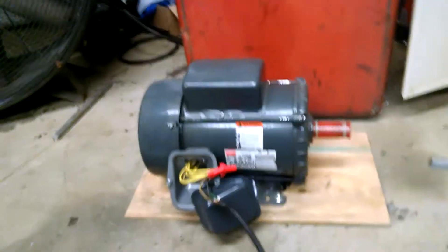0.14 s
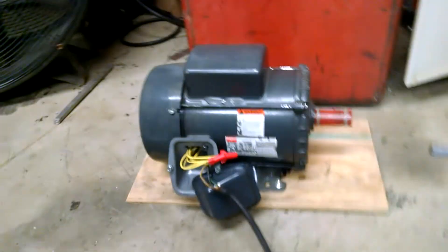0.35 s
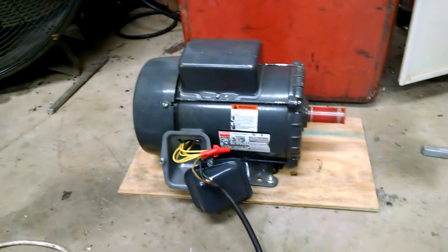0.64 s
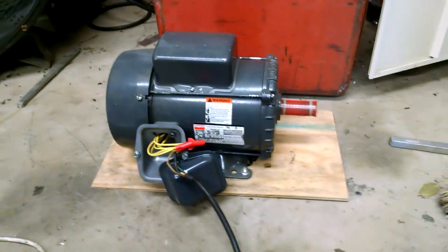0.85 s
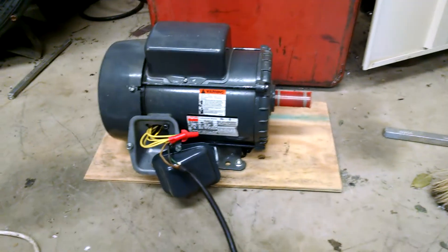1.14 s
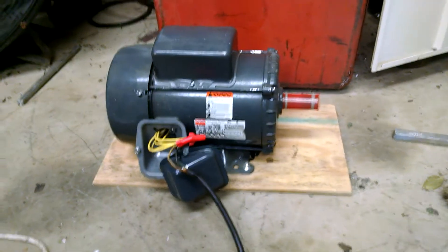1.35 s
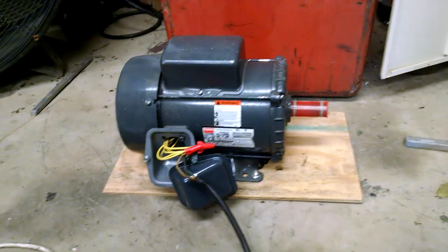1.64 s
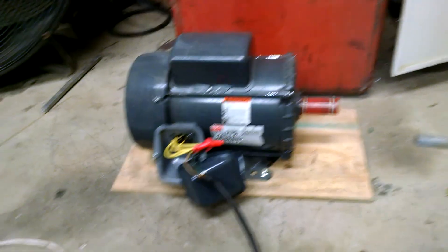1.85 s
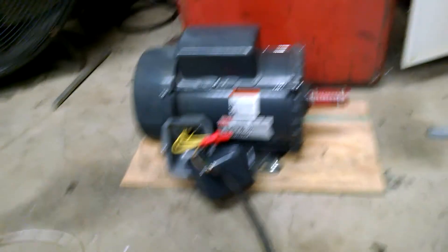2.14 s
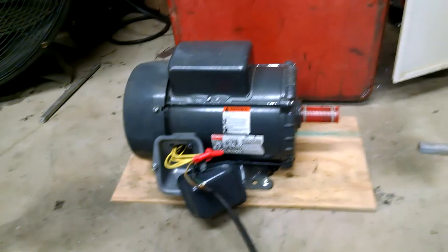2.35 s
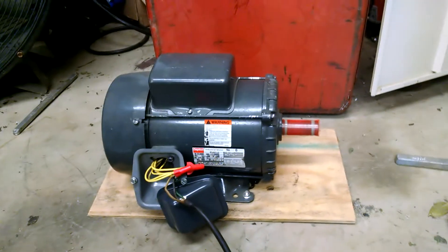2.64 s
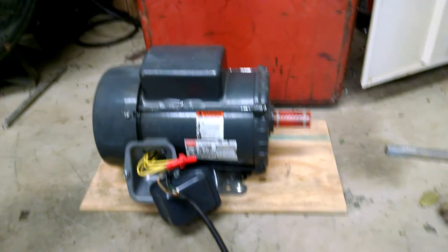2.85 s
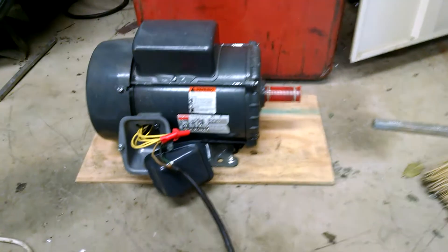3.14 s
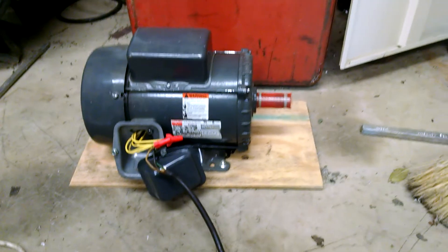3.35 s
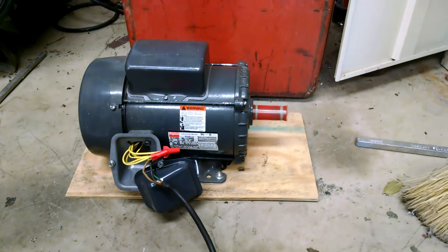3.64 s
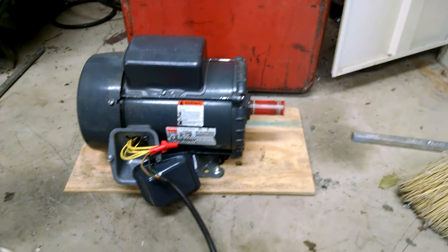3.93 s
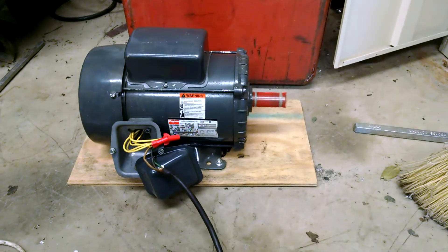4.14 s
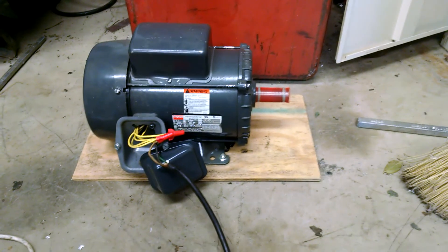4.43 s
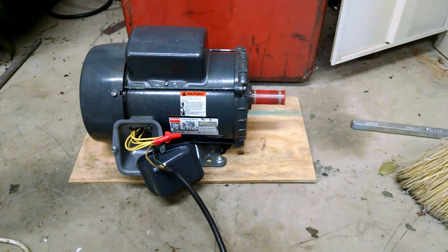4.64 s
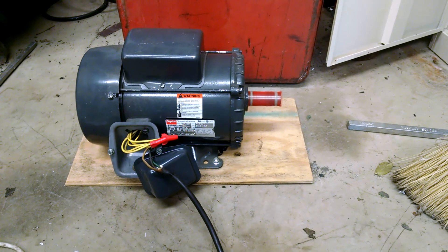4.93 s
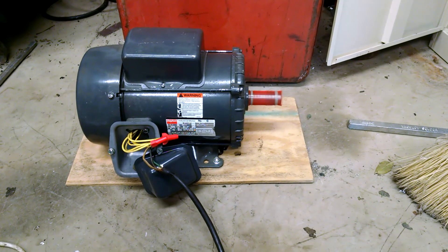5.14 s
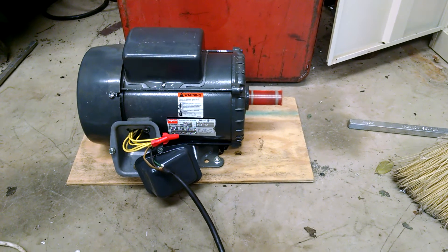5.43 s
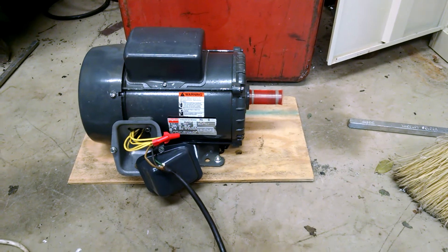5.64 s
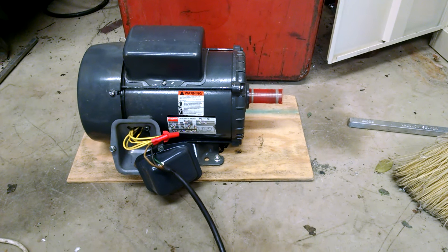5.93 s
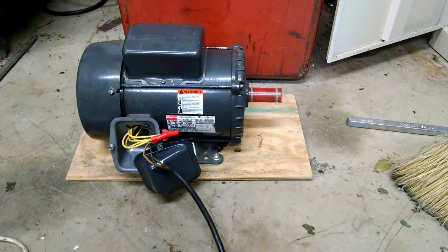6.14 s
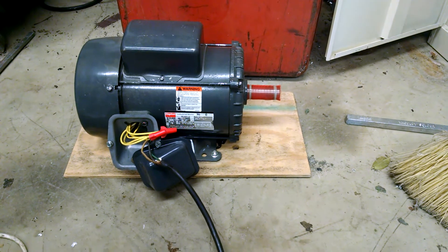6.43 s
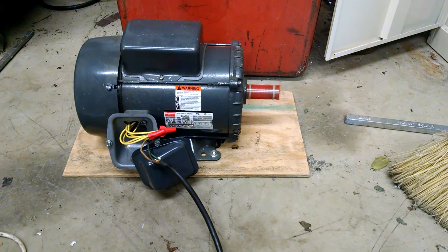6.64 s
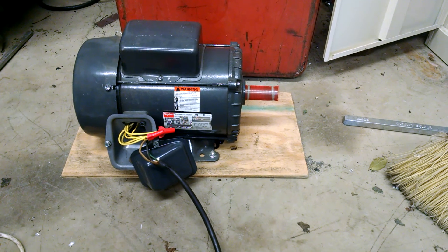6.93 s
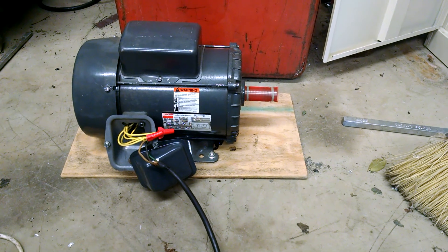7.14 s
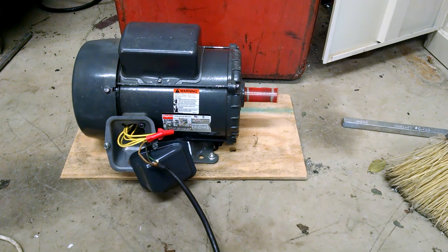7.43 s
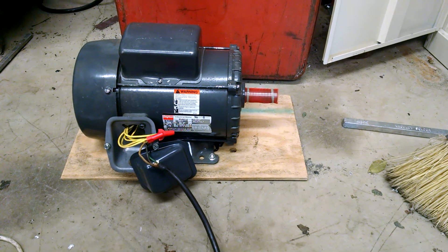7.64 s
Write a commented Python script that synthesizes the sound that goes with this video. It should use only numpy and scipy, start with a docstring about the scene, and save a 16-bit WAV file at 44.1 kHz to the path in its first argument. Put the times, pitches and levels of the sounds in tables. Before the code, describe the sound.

Close stereo camera pickup of an unplugged electric motor on a workshop floor. A breathy fan roar with a whirring undertone and fine metallic hiss glides down in pitch and weakens steadily. About six and a half seconds in, an internal switch snaps shut with a bright cluster of clicks and short room echo, followed by quieter ringing friction as the shaft keeps slowing.

```python
"""Induction motor coasting down

An unplugged motor slows on a workshop floor, close to a camera. Turbulence read in step with the shaft
makes the fan's roar in its cowl; sines locked to the shaft make the whir, and noise makes the rubbing.
At low speed the centrifugal switch snaps shut in a burst of contacts, then drags as noise on a ringing plate.
The camera's gain control starts far down, creeps up, and ducks again at the snap."""
import sys
import numpy as np
from scipy import signal
from scipy.fft import rfft, irfft, next_fast_len
from scipy.io import wavfile
from scipy.ndimage import uniform_filter1d, map_coordinates

SR = 44100
rng = np.random.default_rng(int(sys.argv[2]) if len(sys.argv) > 2 else 0)


def dump(signal):
    """Clip the signal to [-1, 1] and save it as 16-bit WAV at the path in sys.argv[1]."""
    limited = np.clip(np.atleast_2d(signal).T, -1, 1)
    pcm = np.round(limited * 32767).astype(np.int16)
    wavfile.write(sys.argv[1], SR, pcm)


N = 343078
TIME = np.arange(N) / SR

# Contacts of the closing switch. Each row: start in seconds, crack level in dB,
# tilt of the crack in dB per octave, ping frequency in Hz, ping level in dB.
CONTACTS = [(6.5292, -7, 2, 4400, -7.5), (6.532, 0, 0.8, 12000, -4), (6.5344, 4, -0.3, 1150, -1.5),
            (6.5386, -3.5, -0.5, 11900, -5), (6.5400, -3, -1, 11900, -4)]
# Resonances of the shaft and end shield. Each row: centre in Hz, width in Hz, dB above the broad colour.
SHIELD = [(1955, 28, 19.5), (3020, 120, 10.5), (6650, 230, 8.5), (7330, 84, 17.5), (10110, 130, 7)]

REFERENCE_HZ = 37  # shaft speed at which the growth laws have gain 1, turns per second
START_HZ = 55.64  # shaft speed at the start, turns per second


def amp(db):
    """Level law: decibels to amplitude gain."""
    return 10 ** (np.asarray(db) / 20)


def unit(x):
    """Normalisation to an rms value of 1."""
    return x / np.sqrt(np.mean(x ** 2) + 1e-20)


def along(points, hz):
    """Interpolation of (Hz, value) points on a logarithmic frequency axis."""
    f, v = np.transpose(points)
    return np.interp(np.log(hz + 1e-6), np.log(f), v)


def wobble(rate):
    """Slow random modulation: a smooth curve through `rate` random knots per second."""
    knots = rng.standard_normal(int(N * rate / SR) + 4)
    return map_coordinates(knots, [TIME * rate])


def filtered(x, response):
    """Linear filtering: the spectrum of x is multiplied by a response of frequency."""
    size = x.shape[-1]
    padded = next_fast_len(size + SR // 2)
    hz = np.fft.rfftfreq(padded, 1 / SR)
    return irfft(rfft(x, padded) * response(hz), padded)[..., :size]


def rippled(x, spacing_hz, depth_db):
    """Modal irregularity: a fine random ripple, as from many small resonances or favoured eddy sizes."""
    knots = rng.standard_normal(int(SR / spacing_hz) + 4)
    return filtered(x, lambda hz: amp(depth_db * map_coordinates(knots, [hz / spacing_hz])))


def white():
    """Two uncorrelated white noises."""
    return rng.standard_normal((2, N))


def coloured(pair, spectrum, resonances=()):
    """Partial coherence: two unrelated noises mixed as two ports hear them, with resonances, rms 1."""
    # Likeness of the sound at the two ports. Each row: frequency in Hz, coherence from 0 to 1.
    likeness = [(100, 0.35), (2000, 0.43), (7000, 0.7), (9000, 1), (12000, 0.94), (15500, 1)]

    def response(hz):
        peaks = 0
        for centre, width, db in resonances:
            peaks = peaks + amp(db) ** 2 / (1 + (2 * (hz - centre) / width) ** 2)
        colour = amp(along(spectrum, hz)) * np.sqrt(1 + peaks)
        angle = np.arccos(np.clip(along(likeness, hz), 0, 1)) / 2
        return colour * np.array([np.cos(angle), np.sin(angle)])

    common, apart = filtered(pair, response)
    return unit(np.array([common + apart, common - apart]))


def shop(rumble_db, draught_db, hum_db):
    """Ambient noise: low room rumble, a faint draught that differs from port to port, and a mains hum."""
    # Background of the shop. Each row: frequency in Hz, level in dB.
    rumble_colour = [(25, 4), (60, 0), (85, -8), (125, 12), (180, -6), (280, 10), (1000, -3), (8000, -36)]
    rumble = coloured(white(), rumble_colour)
    draught = unit(filtered(white(), lambda hz: hz ** 2 / (1 + (hz / 36) ** 4)))
    hum = np.sqrt(2) * np.sin(2 * np.pi * 60 * TIME)
    hum_gain = amp(hum_db + 2.2 * wobble(3.0))
    return amp(rumble_db) * rumble + amp(draught_db) * draught + hum_gain * hum


def walls(x, t60, wet_db):
    """Diffuse reverberation: convolution with exponentially decaying noise, the shop's short answer."""
    # Colour of the shop's answer. Each row: frequency in Hz, level in dB.
    answer_colour = [(1000, -0.5), (3700, 2), (4500, -0.5), (6500, 2), (9500, -2), (12000, -6), (14000, 0)]
    t = np.arange(SR // 2) / SR
    build_up = 1 - np.exp(-t / 0.0022)
    tail = rng.standard_normal((2, len(t))) * amp(-60 * t / t60) * build_up
    answer = signal.fftconvolve(x, tail / np.linalg.norm(tail[0]), axes=1)[:, :N]
    return filtered(answer, lambda hz: amp(wet_db + along(answer_colour, hz)))


def snap(crack_t60, ping_t60, rise_s, slide_db, slide_s):
    """Impact excitation: springs pull the weights in, a short slide, then steel contacts that crack and ring."""
    # Colour of the crack. Each row: frequency in Hz, level in dB.
    crack_colour = [(300, -9), (1100, -5), (1900, 8), (2800, 3), (4300, 14.5), (5800, 10), (9000, 13),
                    (12000, 20), (14000, 17.5), (15500, 2)]
    # Lingering ring of the switch. Each row: frequency in Hz, level in dB, t60 in seconds.
    steel = [(1130, -24, 0.06), (1185, -24.5, 0.12), (1650, -23, 0.072), (3150, -11, .03),
             (3530, -23, 0.11), (3730, -20, 0.12), (11500, -15, .06), (13790, -14, .1)]
    blur_rad, blur_rate = 1.1, 130  # random phase stray of the ringing (rad) and its knots per second
    t = np.arange(SR // 2) / SR
    rise = 1 - np.exp(-t / rise_s)

    def mode(hz, db, t60):
        """Damped resonance: a decaying sine whose phase strays, with its own start phase at each port."""
        start_phase = rng.random((2, 1))  # in cycles
        stray = blur_rad * map_coordinates(rng.standard_normal(int(blur_rate)), [t * blur_rate])
        return amp(db - 60 * t / t60) * np.sin(2 * np.pi * (hz * t + start_phase) + stray)

    # the slide swells up to the first contact and ends there
    early = CONTACTS[0][0] - TIME
    slide = (early > 0) * amp(slide_db) * np.exp(-np.abs(early) / slide_s)
    out = slide * coloured(white(), crack_colour)
    for start_s, db, tilt, ping_hz, ping_db in CONTACTS:
        tilted = [(hz, level + tilt * np.log2(hz / crack_colour[0][0])) for hz, level in crack_colour]
        crack = amp(db - 60 * t / crack_t60) * coloured(rng.standard_normal((2, len(t))), tilted)
        ring = sum(mode(hz, db + mode_db - 3.0, t60) for hz, mode_db, t60 in steel)
        ping = mode(ping_hz, ping_db, ping_t60)
        out[:, round(start_s * SR):][:, :len(t)] += rise * (crack + ring + ping)
    return out


def drag(level_db, fade_db, grain_db):
    """Sliding friction: once shut, the switch's collar rubs on its plate and sets it ringing."""
    # Colour of the dragging switch. Each row: frequency in Hz, level in dB.
    drag_colour = [(200, -14), (600, -14), (1150, -5.5), (1330, -9), (2400, -20), (3400, 3), (4500, -3.5),
                   (5800, -4), (9000, -5), (10200, 4), (13000, 4.5), (15500, 1.5)]
    # Resonances of the switch plate. Each row: centre in Hz, width in Hz, dB above the broad colour.
    plate = [(1664, 32, 21), (1954, 23, 29.5), (2100, 27, 30), (2530, 30, -3), (3760, 39, 9),
             (3990, 31, 10.5), (6960, 100, 6), (11700, 110, -3), (13850, 190, -1)]
    age = np.maximum(TIME - CONTACTS[-1][0], 0)
    pressed = 1 - np.exp(-age / .02)
    level = amp(level_db - fade_db * age + grain_db * wobble(170))
    return pressed * level * coloured(white(), drag_colour, plate)


def shaft_speed():
    """Exponential decay: the rotor loses a fixed share of its speed each second; the shut switch brakes it more."""
    coast_s = 7.485  # time in which coasting alone sinks to 1/e
    brake_hz_per_s = 2.4  # turns per second lost each second
    shut_s = np.maximum(TIME - CONTACTS[-1][0], 0)
    return START_HZ * np.exp(-TIME / coast_s) - brake_hz_per_s * shut_s


def rubbing(speed, turns, growth, high_spot, arc, grain_db):
    """Periodic friction: the shaft hisses all the way round, less as it slows, and scrapes over one arc a turn."""
    # Colour of the hiss. Each row: frequency in Hz, level in dB.
    hiss_colour = [(800, -26), (3000, 11.5), (4800, 3), (7500, 2.5), (10000, 14.5), (12000, 13.5),
                   (14000, 17), (15500, 9)]
    # Colour of the scrape. Each row: frequency in Hz, level in dB.
    scrape_colour = [(1000, -10), (4000, -7.5), (7500, -15.5), (9500, 0), (11400, -4), (13000, 5.5),
                     (14000, 7), (15500, -2)]
    hiss_db, scrape_db = -29.0, -26  # hiss at the reference speed; scrape at full contact
    below_hz, spread_hz = 59, 1.2  # soft speed limit of the scrape, turns per second
    # distance from the high spot, in turns
    away = (turns - high_spot + .5) % 1 - .5
    touch = np.exp(-(2 * away / arc) ** 2) * amp(0.9 * wobble(25))
    # already near 1 at the starting speed
    settled = 1 / (1 + np.exp((speed - below_hz) / spread_hz))
    hiss_gain = amp(hiss_db + grain_db * wobble(400)) * (speed / REFERENCE_HZ) ** growth
    hiss = hiss_gain * coloured(white(), hiss_colour, SHIELD)
    scrape_gain = amp(scrape_db + grain_db * wobble(500)) * settled * touch
    scrape = scrape_gain * coloured(white(), scrape_colour, SHIELD)
    return hiss + scrape


def whir(speed, turns, growth, wander, waver_db):
    """Order tones: sines glide down with the shaft and swell as they pass the plywood base's resonances."""
    # Tones of shaft, bearings and blades. Each row: multiple of the shaft speed,
    # level in dB at the reference speed before the base's response.
    orders = [(1, -60.5), (2.83, -48), (3.45, -53), (4.62, -44.8), (8, -45.2), (13.7, -48), (22.2, -50)]
    # How well the plywood base radiates the tones. Each row: frequency in Hz, gain in dB.
    board = [(50, 0), (78, -5), (90, 0), (103, 5), (123, 0), (143, -3.5), (158, -9), (180, -5), (200, 3),
             (235, 2.5), (250, -1), (265, 2.5), (290, -1), (330, 2), (430, -0.5), (800, -2)]
    tones = 0
    for multiple, db in orders:
        level = amp(db + along(board, multiple * speed) + waver_db * wobble(7))
        phase = 2 * np.pi * multiple * turns + wander * wobble(9)
        tones = tones + level * np.sin(phase)
    return np.sqrt(2) * tones * (speed / REFERENCE_HZ) ** growth


def fan(speed, turns, level_db, growth):
    """Flow noise: eddies shed in step with the blades sink in pitch and fade, inside a cowl of fixed resonances."""
    # Fan turbulence. Each row: multiple of the shaft speed, level in dB.
    eddy_colour = [(.8, -23), (2, -9.5), (4, -2.5), (7, -0.5), (13, 1), (30, 1), (100, -2.5), (400, -10.5)]
    # Broad colour of the fan's air. Each row: frequency in Hz, dB at full speed, dB when slow.
    air_colour = [(30, -15, -23), (70, -2, -14), (99, -3.5, -11), (140, -2, -3), (177, -6, -9),
                  (209, -2.5, -4.5), (358, 1.5, -0.5), (432, 0, -10.5), (500, -0.5, 1), (690, -2.5, -1.5),
                  (950, -2, -5), (992, -3, -1), (1386, -3.5, -10.5), (1840, -7.5, -8.5), (2140, -5, -10.5),
                  (2720, -0.5, -9.5), (2930, -4.5, -8), (3500, -8.5, -11.5), (4250, -13, -11.5),
                  (5040, -6.5, -12), (6050, -13, -10), (8950, -11.5, -18), (15500, -20, -9)]
    # Air resonances of the cowl. Each row: centre in Hz, width in Hz,
    # dB above the broad colour at full speed, dB above it when slow.
    cowl = [(520, 20, 0, -16), (612, 27.6, 6, 6.5), (1090, 33, 9, 8), (1560.6, 43, 10.5, 14.5),
            (1592, 13, 13.5, -8), (1663, 20, 7, 13), (1948, 68, 5.5, 10), (2156, 58, -3, 10),
            (2600, 170, -0.5, -3), (2993, 83, -5, 8.5)]
    slow_hz = 26.8  # turns per second below which the slow colour stays
    # noise is laid out along shaft angle and read at the pace of the turning shaft
    place = turns * SR / REFERENCE_HZ
    noise = rng.standard_normal((2, int(place[-1]) + 2))
    eddies = filtered(noise, lambda hz: amp(along(eddy_colour, hz / REFERENCE_HZ)))
    eddies = rippled(eddies, spacing_hz=20, depth_db=0.8)
    swept = np.array([map_coordinates(eddy, [place], order=3) for eddy in eddies])

    fast_air = [(hz, db) for hz, db, _ in air_colour]
    slow_air = [(hz, db) for hz, _, db in air_colour]
    fast_cowl = [(hz, width, db) for hz, width, db, _ in cowl]
    slow_cowl = [(hz, width, db) for hz, width, _, db in cowl]
    fast = coloured(swept, fast_air, fast_cowl)
    slow = coloured(swept, slow_air, slow_cowl)
    flow = np.clip((speed - slow_hz) / (START_HZ - slow_hz), 0, 1)
    gain = amp(level_db + 0.72 * wobble(7)) * (speed / REFERENCE_HZ) ** growth
    return gain * (flow * fast + (1 - flow) * slow)


def scene():
    """Superposition: the sources add, and the shaft's speed drives everything that turns."""
    speed = shaft_speed()
    turns = np.cumsum(speed) / SR
    background = shop(rumble_db=-50.5, draught_db=-57.0, hum_db=-54.5)
    switch = snap(crack_t60=0.031, ping_t60=0.021, rise_s=0.00011, slide_db=-19, slide_s=0.007)
    room = walls(switch, t60=0.29, wet_db=-4.5) + background
    collar = drag(level_db=-26.0, fade_db=0.4, grain_db=1.0)
    shaft = rubbing(speed, turns, growth=1.46, high_spot=0.11, arc=0.36, grain_db=1.27)
    friction = rippled(shaft + collar, spacing_hz=45, depth_db=1.1)
    tones = whir(speed, turns, growth=3.9, wander=0.5, waver_db=1.8)
    roar = fan(speed, turns, level_db=-20.5, growth=3.07)
    air = rippled(roar, spacing_hz=16, depth_db=0.8)
    return air + tones + friction + switch + room


def widened(ports, onset_hz, first_hz, period_hz):
    """Mid-side coding: the camera's stereo widening deals the treble out in turn to mid and side."""
    # Share of the side signal below the onset. Each row: frequency in Hz, angle in radians.
    low_angle = [(25, 0.8), (60, 0.46), (125, 0.3), (300, 0.35), (600, 0.29), (1200, 0.16)]
    # How much of the ports' difference stays in the middle. Each row: frequency in Hz, gain in dB.
    leak = [(1500, -34), (2500, -8), (4500, -28), (15000, -37)]
    # Left minus right. Each row: frequency in Hz, difference in dB.
    balance = [(100, -3), (600, -1.5), (1300, 0.3), (2600, -2), (4000, -0.4), (9000, -2.5), (14000, -1)]

    def split(hz):
        angle = np.where(hz > onset_hz, np.pi * (hz - first_hz) / period_hz, along(low_angle, hz))
        # the side is turned by a quarter period
        return np.array([np.cos(angle), -1j * np.sin(angle)])

    mid, side = filtered(ports, split)
    mid = mid + filtered(ports[1] - ports[0], lambda hz: amp(along(leak, hz)))
    stereo = np.array([mid + side, mid - side])
    return filtered(stereo, lambda hz: amp(np.outer([.5, -.5], along(balance, hz))))


def gain_control(x, limit_db, start_db, release_db):
    """Limiting: gain drops at once over the limit and returns by release_db a second; it begins start_db down."""
    power = np.abs(uniform_filter1d(np.mean(x ** 2, axis=0), size=130))
    excess_db = np.maximum(10 * np.log10(power + 1e-12) - limit_db, 0)
    # a running maximum against a rising ramp holds each drop, then releases it
    held_db = np.maximum.accumulate(np.maximum(excess_db + release_db * TIME, start_db))
    return x * amp(release_db * TIME - held_db)


def record(dry):
    """Signal chain: stereo widening, gain control and the camera's band limit."""
    wide = widened(dry, onset_hz=1720, first_hz=1300, period_hz=2570)
    levelled = gain_control(wide, limit_db=-11.5, start_db=25.0, release_db=9.0)
    return filtered(levelled, lambda hz: hz < 15750)


dry = scene()
out = record(dry)
dump(out)
```